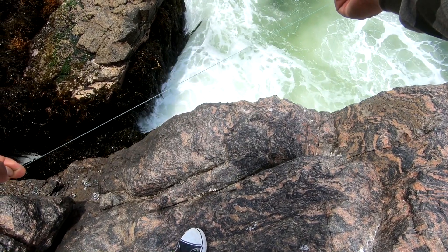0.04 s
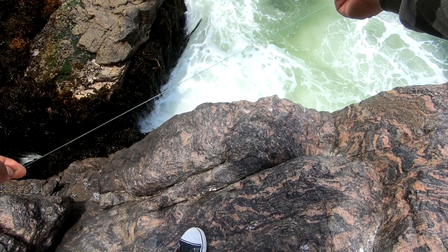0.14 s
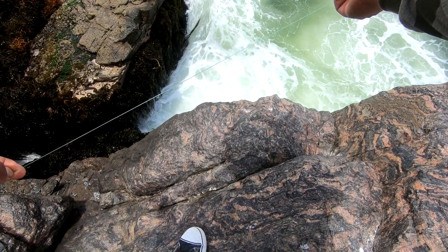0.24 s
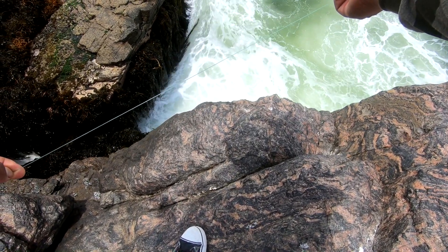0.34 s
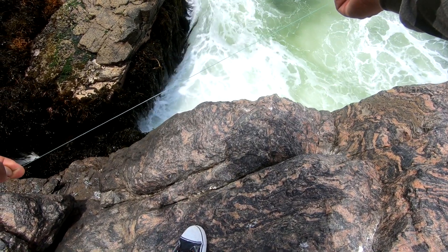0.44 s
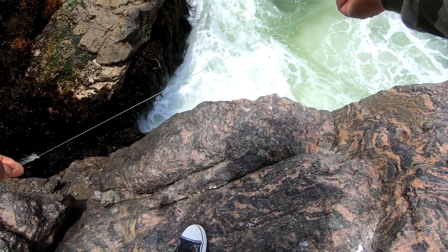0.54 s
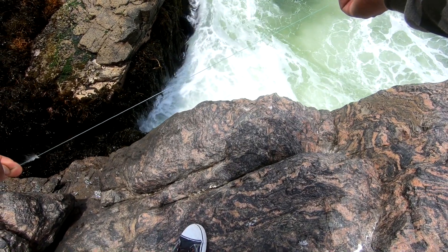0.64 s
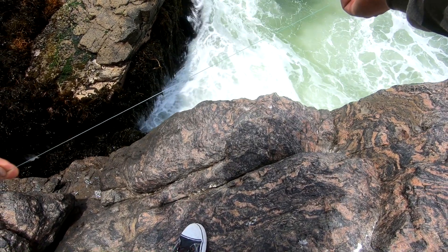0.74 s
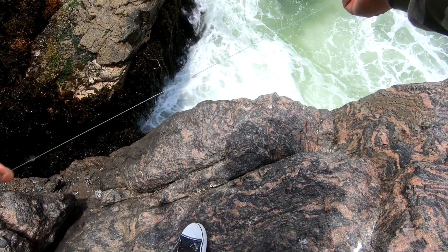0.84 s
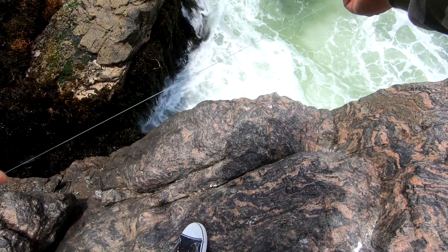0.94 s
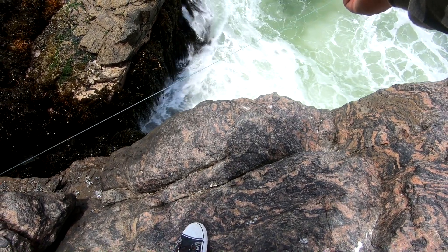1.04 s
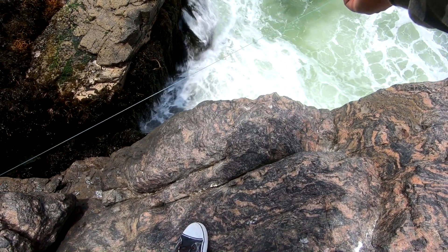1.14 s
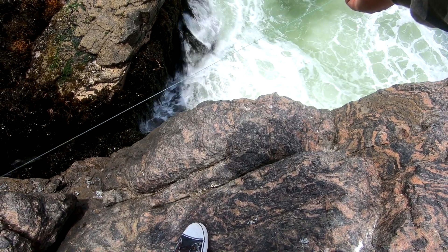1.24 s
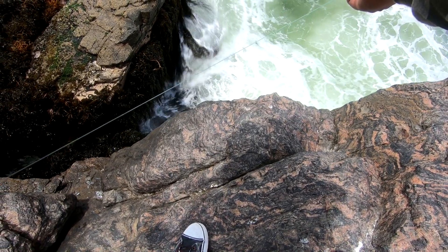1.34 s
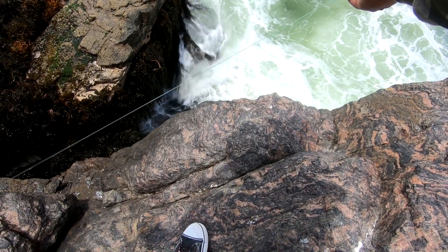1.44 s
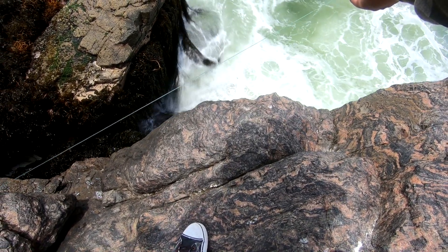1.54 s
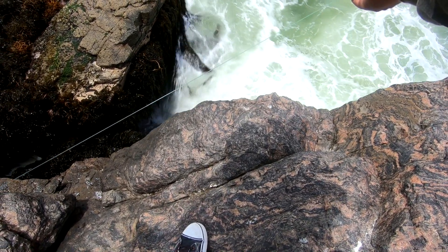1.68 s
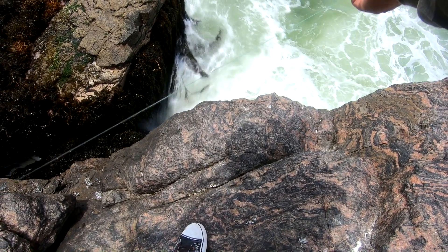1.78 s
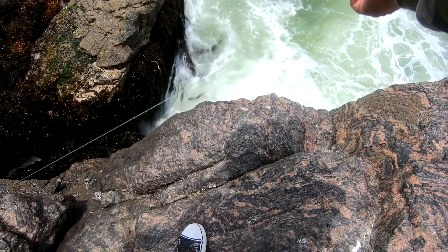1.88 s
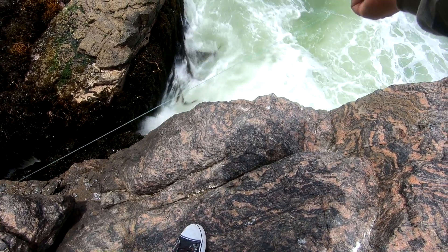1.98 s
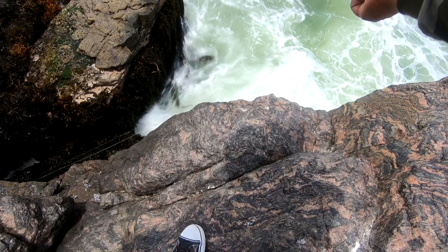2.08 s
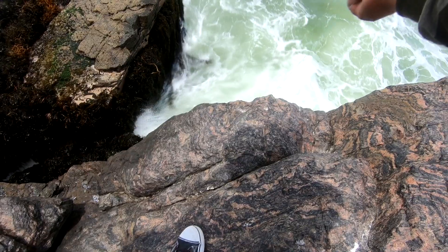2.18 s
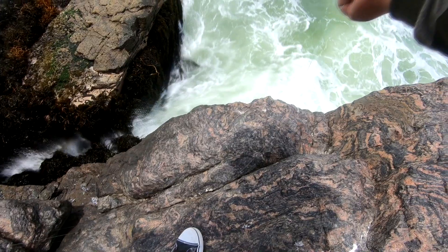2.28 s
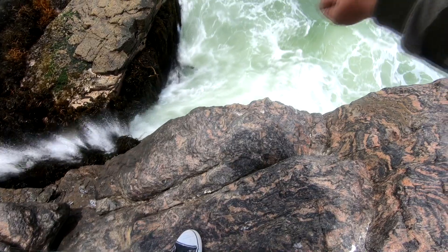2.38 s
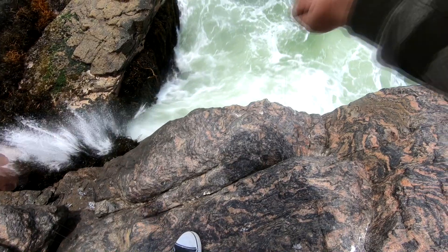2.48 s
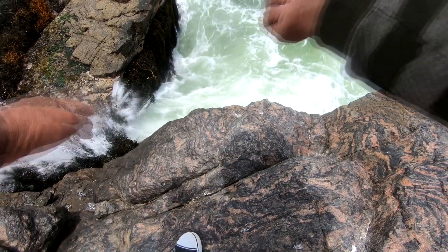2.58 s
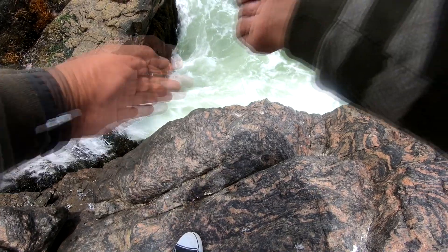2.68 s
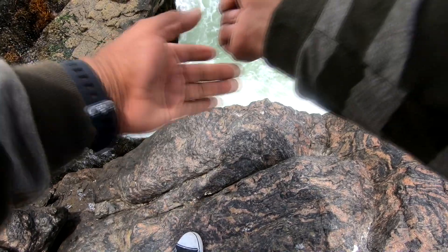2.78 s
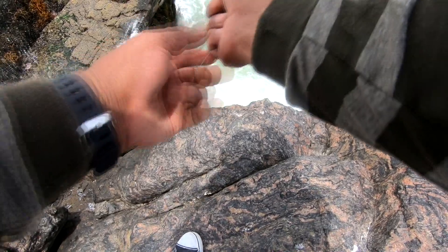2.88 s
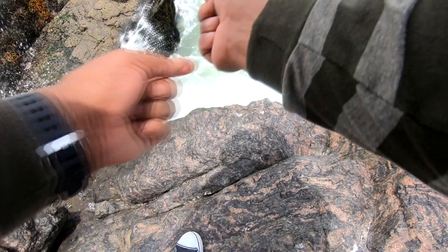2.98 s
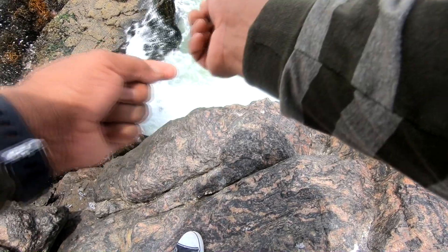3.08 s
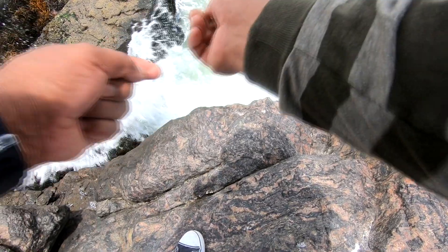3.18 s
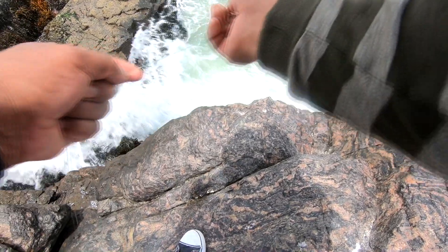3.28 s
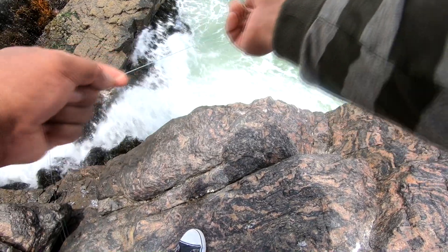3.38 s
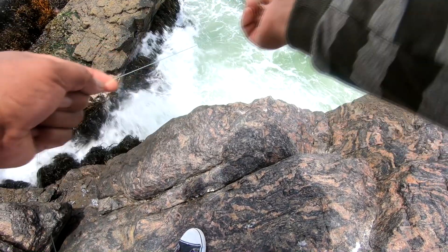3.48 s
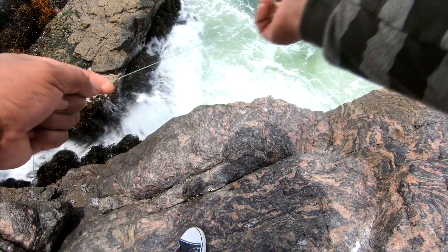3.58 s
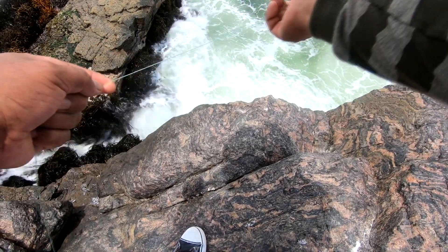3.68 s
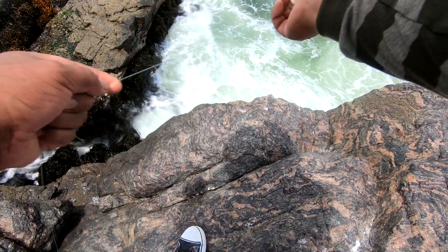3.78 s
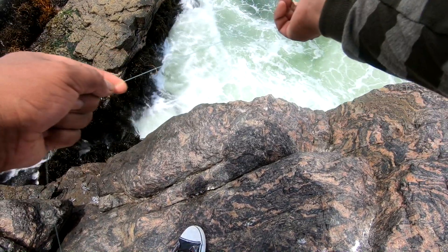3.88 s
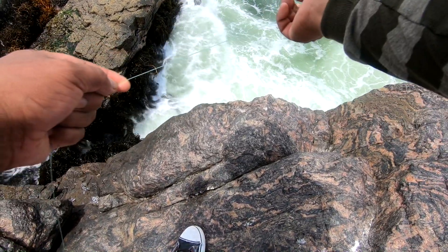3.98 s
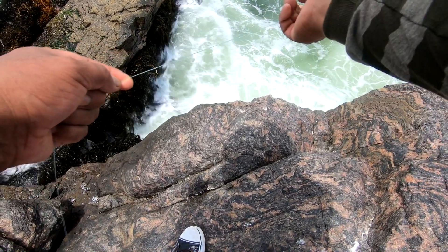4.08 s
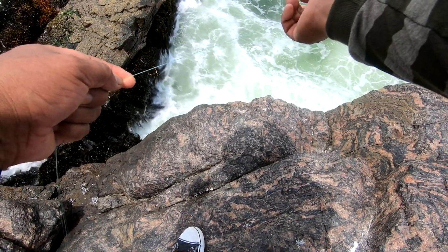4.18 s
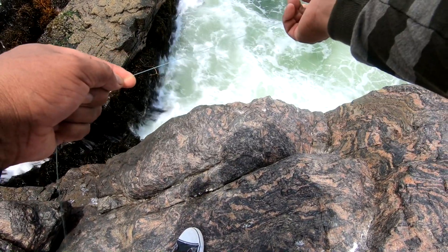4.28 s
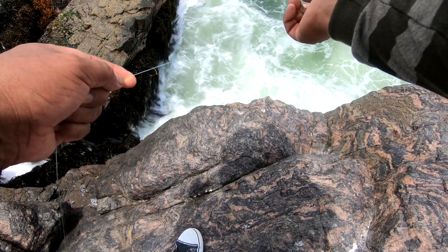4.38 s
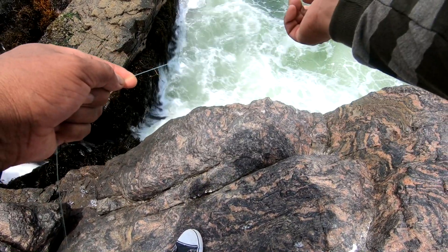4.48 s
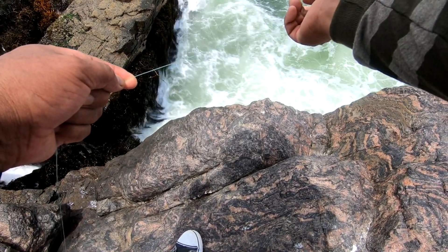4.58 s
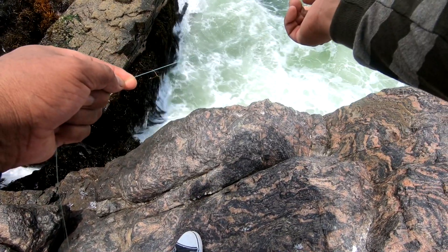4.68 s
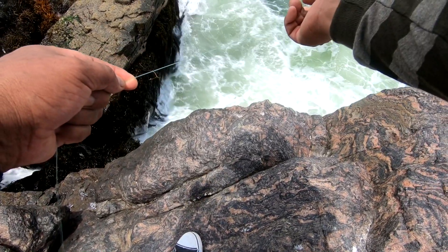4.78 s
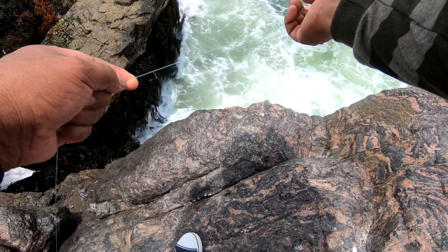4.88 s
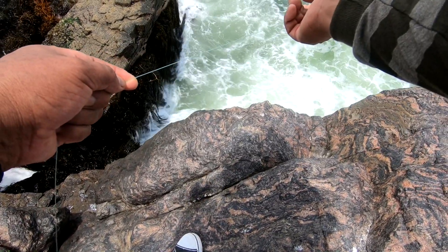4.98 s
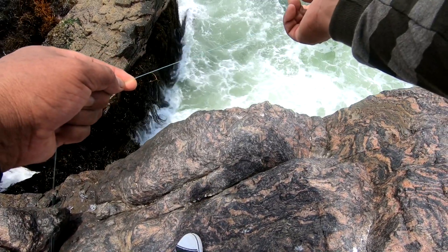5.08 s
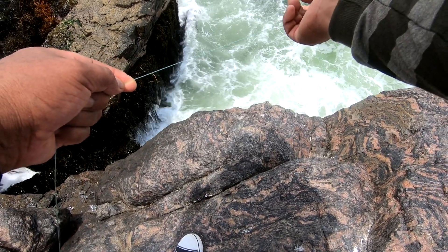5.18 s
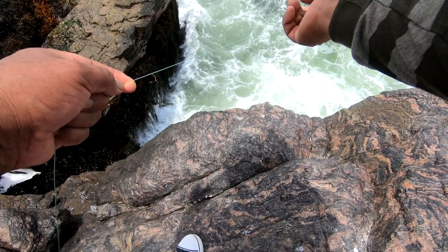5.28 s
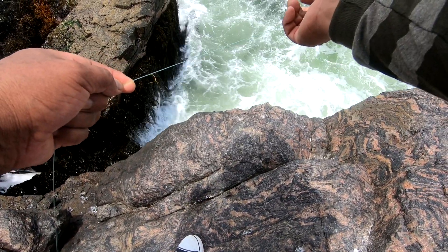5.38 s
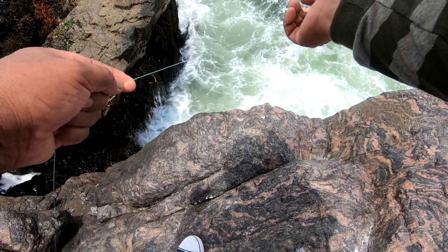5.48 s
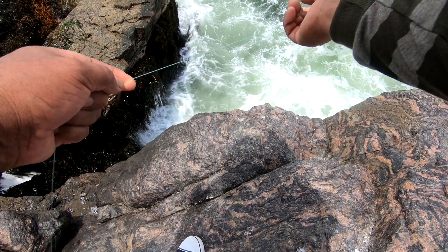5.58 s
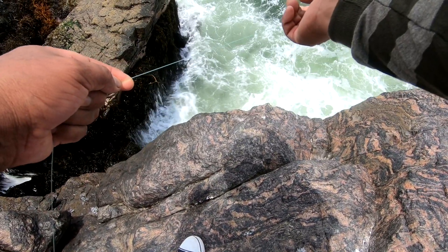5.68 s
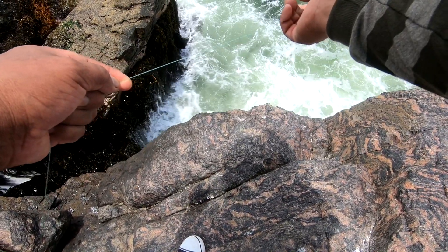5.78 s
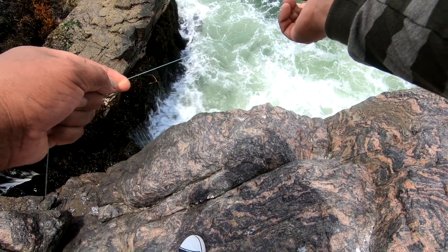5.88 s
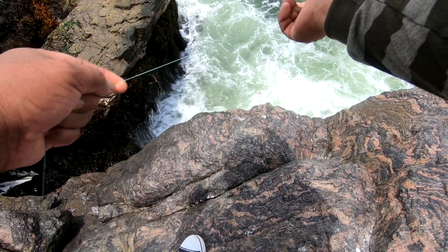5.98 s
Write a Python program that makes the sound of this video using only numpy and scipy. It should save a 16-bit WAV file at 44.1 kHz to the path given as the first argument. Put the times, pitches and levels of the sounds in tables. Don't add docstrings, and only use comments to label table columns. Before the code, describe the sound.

Outdoors on rocks above a narrow sea gully, foamy water churns with a steady wash. Wind rumble and surf build together, bursting into a rough splashing surge around two and a half seconds. The water drops back, surges once more, then settles into softer hissing foam. A small camera close to the wearer catches low buffeting gusts and a faint high air hiss.

```python
import sys
import numpy as np
from scipy import signal
from scipy.fft import rfft, irfft, next_fast_len
from scipy.io import wavfile
from scipy.ndimage import uniform_filter1d

SR = 44100
rng = np.random.default_rng(int(sys.argv[2]) if len(sys.argv) > 2 else 0)


def field_ratio(decibels):
    return 10 ** (np.asarray(decibels, dtype=float) / 20)


def dump(signal):
    limited = np.clip(np.atleast_2d(signal).T, -1, 1)
    pcm = np.round(limited * 32767).astype(np.int16)
    wavfile.write(sys.argv[1], SR, pcm)


N = 266364

# (time [s], strength [dB], big eddies over roar [dB], edge rustle over roar [dB])
GUST = [(0.0, -39.5, 8.5, -2), (0.15, -40.5, -0.5, -3), (0.32, -38.5, 0, -2.5), (0.42, -30, -7, -7.5),
        (0.66, -40.5, 5, 0), (0.79, -32.5, -1, -7), (1.09, -35, 0.5, 1), (1.39, -26, -6, -7.5),
        (1.75, -24.5, -7, -10.5), (2.12, -22.5, -1, -10.5), (2.24, -26, -2.5, -7),
        (2.36, -21.5, -6.5, -7.5), (2.95, -24.5, -4, -11), (3.3, -28.5, -1.5, -8), (4.0, -33, 6.5, -5.5),
        (4.2, -35, 2.5, -13.5), (4.61, -38.5, 0, -5), (6.04, -38.5, -1.5, -1.5)]
GUST_SHARES = [
    [0.78, 1.09, 1.17, 0.94],
    [1, 0.95, 0.022, 0.059],
    [0.27, -0.29, 0.099, 0.99],
]
WIND_ZONES_HZ = [55, 165, 350, 760]
# (frequency [Hz], density [dB per Hz])
WIND_COLOUR = [(12, -30), (25, -8.5), (60, -4), (280, 0.5), (540, -5), (760, -11.5), (980, -16.5),
               (1090, -22), (1200, -51), (1600, -80)]
# (time [s], surge [dB], spray over foam [dB], big bubbles over foam [dB])
SURGE = [(0.0, -48, -16, -4), (0.01, -44, -19, -6), (0.71, -42.5, -20.5, -4.5), (1.35, -38, -18.5, -7),
         (2.22, -34, -20.5, -9), (2.35, -33, -17, -6.5), (2.47, -30, -18, -11.5), (2.59, -35.5, -17, -7.5),
         (2.67, -31.5, -22, -9), (2.78, -37.5, -17.5, -7.5), (3.26, -41.5, -17, -8), (3.7, -34, -20, -11),
         (4.02, -35.5, -23, -12), (4.12, -43.5, -23, -5), (4.27, -44, -23, -6), (5.05, -44, -20, -6),
         (6.02, -41, -20, -9), (6.04, -41, -21, -5)]
SURGE_SHARES = [
    [0.89, 1.01, .95, 1],
    [.05, -0.14, .3, 1.1],
    [1, 0.15, .05, .05],
]
SURF_ZONES_HZ = [1500, 3290, 6430, 9500]
# (frequency [Hz], density [dB per Hz])
SURF_COLOUR = [(640, -14), (1080, -1.5), (1170, -4.5), (1580, -5), (1870, -3.5), (2140, -5), (2640, -2),
               (3220, -0.5), (4250, -2), (5140, -6), (5790, -4), (7420, -12.5), (9320, -25.5),
               (10800, -37.5), (11600, -40), (15100, -63), (22000, -120)]
# (centre [Hz], width [Hz], gain [dB])
HOUSING_MODES = [(1850, 80, 2.5), (2560, 170, 0.5), (3400, 500, 0.5), (3840, 230, 1), (4360, 250, 1),
                 (5530, 400, 0.5)]
# (time [s], hiss [dB])
PORT_FLOW = [
    (0.3, -91),
    (0.82, -85),
    (0.97, -91),
    (1.84, -69),
    (2.41, -63.5),
    (3.14, -73),
    (3.87, -65),
    (3.98, -76),
    (4.1, -104),
]
# (frequency [Hz], density [dB per Hz])
PORT_COLOUR = [(10500, -51), (11400, -11), (11900, -2), (12600, 2), (15000, -3), (15700, -4.5)]
# (time [s], level [dB], frequency [Hz], length [s])
PUFFS = [(0.026, -44, 80, 0.016), (0.058, -34.5, 324, 0.036), (0.318, -36.5, 76, 0.098),
         (0.45, -38.5, 73.4, 0.048), (0.522, -22.5, 417, 0.032), (0.767, -21.5, 86, 0.06),
         (0.806, -30, 328, 0.086), (2.386, -18, 116, 0.049), (2.621, -21.5, 137, 0.068),
         (3.159, -21.5, 88, 0.12), (3.398, -23.5, 84, 0.063), (3.566, -29, 85, 0.086),
         (3.967, -24, 270, 0.05), (4.025, -23, 244, 0.053), (4.029, -27, 65, 0.18),
         (4.912, -31, 107, 0.077), (5.152, -26.5, 84, 0.093), (5.309, -33.5, 400, 0.16),
         (5.359, -29.5, 119, 0.078), (5.778, -31, 61, 0.027), (5.817, -34.5, 72.4, 0.2),
         (0.022, -32, 637.2, 0.0152), (0.52, -27, 543, 0.0184), (0.746, -26.5, 710, 0.0172),
          (0.402, -33, 427, 0.13), (3.838, -28, 157.4, 0.0295), (3.875, -23.5, 216, 0.034),
          (4.134, -27, 230, 0.026), (3.39, -24, 231, 0.03), (3.55, -21.5, 344, 0.045),
          (2.11, -21, 237.6, 0.075), (4.966, -29, 118.8, 0.033), (5.07, -32, 60, 0.04),
          (5.353, -25, 216, 0.018), (5.357, -27, 756, 0.0093), (.1, -45, 150, .2), (.53, -27, 131, .08),
          (.87, -29, 140, .12), (1.445, -22, 298, .03), (1.5, -29, 150, .1), (1.95, -26, 169, .12),
          (2.28, -27, 90, .1), (2.67, -20, 290, .12), (3.0, -22, 190, .14), (3.04, -31, 380, .1),
          (3.72, -24, 159, .09), (4.3, -36, 165, .14), (4.36, -32, 295, .08), (4.72, -43, 420, .2),
          (4.85, -34, 250, .06), (5.96, -34, 150, .05)]
# (start [s], end [s], difference [dB])
WIDTH = [(.05, 0.17, -66), (0.282, 1.026, -64.5), (1.048, 1.673, -59), (1.893, 1.959, -54),
         (2.344, 2.442, -51), (2.7, 2.752, -54), (2.834, 2.91, -58), (2.945, 3.154, -58),
         (3.45, 3.537, -58), (3.667, 3.713, -56), (3.972, 4.093, -58.5), (4.752, 4.816, -67)]
# (frequency [Hz], density [dB per Hz])
WIDTH_COLOUR = [(700, -12), (1000, -6), (2400, -7.5), (3400, -7.5), (5000, -7), (6500, -6), (8500, -17),
                (10000, -31)]
# (start [s], end [s], centre [Hz], width [Hz], gain [dB])
SHADING = [(0, 0.61, 2320, 550, -4), (-0.5, .8, 4800, 500, 3), (0.3, 1.63, 880, 140, -4),
           (1.1, 1.19, 2900, 910, 2), (0.7, 1.89, 2780, 520, 3), (4.1, 4.5, 5600, 2000, 1.5),
           (2.5, 3.36, 9700, 1900, -5), (3, 3.3, 3100, 680, -2.5), (1.2, 1.53, 192, 70, -4.5),
           (1.5, 2.8, 1840, 200, 2), (1.1, 2.6, 2250, 390, -3), (2.5, 2.75, 1080, 120, 3.5),
           (3.5, 4.2, 4450, 830, -4), (3.5, 4.2, 6100, 740, 3), (3.6, 5.0, 3280, 310, 3)]


def rms_one(x):
    return x / np.sqrt(np.mean(x ** 2) + 1e-20)


def in_time(rows):
    time_s, *columns = np.transpose(rows)
    return [np.interp(np.arange(N) / SR, time_s, column) for column in columns]


def at_hz(points_hz, values, hz):
    return np.interp(np.log(hz), np.log(points_hz), values)


def drift(rate_hz):
    pole = np.exp(-80 * np.pi * rate_hz / SR)
    noise = rng.standard_normal(N // 40 + 2002)
    slow = signal.lfilter([1], [1, -2 * pole, pole * pole], noise)[2000:]
    return np.interp(np.arange(N) / 40, np.arange(len(slow)), rms_one(slow))


def pops(per_s, spread_db):
    size_db = spread_db * np.minimum(rng.exponential(1, N), 5)
    clicks = field_ratio(size_db) * rng.choice([-1, 1], N)
    return rms_one(clicks * (rng.random(N) < per_s / SR))


def coloured(source, colour):
    size = next_fast_len(N)
    hz = np.maximum(np.fft.rfftfreq(size, 1 / SR), 1)
    return rfft(source, size) * field_ratio(at_hz(*np.transpose(colour), hz)), hz


def coloured_noise(colour):
    spectrum, _ = coloured(rng.standard_normal(N), colour)
    return rms_one(irfft(spectrum)[:N])


def zone_levels(curve, mean_db, shares):
    controls = np.array(in_time(curve))
    swing = controls - controls.mean(axis=1, keepdims=True)
    return mean_db + np.transpose(shares) @ swing


def zones(spectrum, hz, zones_hz, levels_db, count, shared_db, own_db, shared_rate_hz, own_rate_hz):
    power = np.mean(field_ratio(levels_db) ** 2, axis=1)
    swell_db = levels_db - 10 * np.log10(power)[:, None]
    centres_hz = np.geomspace(zones_hz[0] / 2, zones_hz[-1] * 1.52, count)
    together = drift(shared_rate_hz)
    out = 0
    for centre_hz, one_band in zip(centres_hz, np.eye(count)):
        nearness = [at_hz(zones_hz, one_zone, centre_hz) for one_zone in np.eye(len(zones_hz))]
        flicker_db = shared_db * together + own_db * drift(own_rate_hz)
        band = irfft(spectrum * at_hz(centres_hz, one_band, hz))[:N]
        out = out + band * field_ratio(nearness @ swell_db + flicker_db)
    return out * np.sqrt(power.sum()) / np.std(irfft(spectrum))


def wind():
    eddies = pops(per_s=250, spread_db=2.5) * field_ratio(-7) + rng.standard_normal(N)
    spectrum, hz = coloured(eddies, WIND_COLOUR)
    levels_db = zone_levels(GUST, -34.5, GUST_SHARES)
    return zones(spectrum, hz, WIND_ZONES_HZ, levels_db, count=11,
                 shared_db=0.92, own_db=-0.05, shared_rate_hz=36, own_rate_hz=5.0)


def surf():
    bursts = pops(per_s=9000, spread_db=2.5) * field_ratio(-3) + rng.standard_normal(N)
    spectrum, hz = coloured(bursts, SURF_COLOUR)
    ringing_db = 0
    for centre_hz, width_hz, gain_db in HOUSING_MODES:
        ringing_db = ringing_db + gain_db / (1 + (2 * (hz - centre_hz) / width_hz) ** 2)
    levels_db = zone_levels(SURGE, -45, SURGE_SHARES)
    return zones(spectrum * field_ratio(ringing_db), hz, SURF_ZONES_HZ, levels_db, count=14,
                 shared_db=0.3, own_db=0.78, shared_rate_hz=40, own_rate_hz=14)


def port_hiss():
    crest_share, flicker_db = 0.7, 0.6
    pan_db, pan_full_db, pan_span_db = -5.5, -68, 20
    flow_db, = in_time(PORT_FLOW)
    surge_db, spray_db, _ = in_time(SURGE)
    thrown_db = surge_db + spray_db
    crest_db = thrown_db - uniform_filter1d(thrown_db, size=SR // 2)
    lean_db = pan_db * np.clip(1 + (flow_db - pan_full_db) / pan_span_db, 0, 1)
    t = np.arange(N) / SR
    blowing = np.clip((t + 0.05) / 0.4, 0, 1) * (t < PORT_FLOW[-1][0])
    level_db = flow_db + 5.5 + crest_share * crest_db + flicker_db * drift(14)
    hiss = np.array([coloured_noise(PORT_COLOUR) for side in "LR"])
    return field_ratio(level_db + np.outer([0.5, -0.5], lean_db)) * blowing * hiss


def puffs():
    out = np.zeros(N + SR)
    for time_s, level_db, hz, length_s in PUFFS:
        size = int(length_s * 0.75 * SR)
        sos = signal.butter(2, [hz / 1.77, hz * 1.55], "band", fs=SR, output="sos")
        turbulence = signal.sosfilt(sos, rng.standard_normal(SR // 2))[-size:]
        start = max(int(time_s * SR) - size // 2, 0)
        out[start:start + size] += field_ratio(level_db - 4) * rms_one(turbulence * np.hanning(size))
    return out[:N]


def width():
    t = np.arange(N) / SR
    gate = sum(field_ratio(db) * ((t > start_s) & (t < end_s)) for start_s, end_s, db in WIDTH)
    return uniform_filter1d(gate, size=600) * coloured_noise(WIDTH_COLOUR) * [[1], [-1]]


def shaded(x):
    size = next_fast_len(N)
    spectrum, hz = rfft(x, size), np.fft.rfftfreq(size, 1 / SR)
    t = np.arange(N) / SR
    out = x.copy()
    for start_s, end_s, centre_hz, width_hz, gain_db in SHADING:
        band = irfft(spectrum * np.exp(-2 * ((hz - centre_hz) / width_hz) ** 2))[:N]
        swell = np.clip(np.minimum(t - start_s, end_s - t) / 0.086 + 0.5, 0, 1)
        out += (field_ratio(gain_db) - 1) * swell * band
    return out


def housed(gusts):
    stiff_peak, cut_hz = 0.42, 1067
    stiffened = stiff_peak * np.tanh(gusts / stiff_peak)
    sos = signal.cheby2(6, 35, cut_hz * 1.237, fs=SR, output="sos")
    return signal.sosfilt(sos, stiffened)


def scene():
    roar, foam, hiss = wind(), surf(), port_hiss()
    gusts = housed(roar + puffs())
    return shaded(gusts + foam) + width() + hiss


def low_pass(x):
    return signal.sosfilt(signal.butter(12, 15715, fs=SR, output="sos"), x)


def record(dry):
    return low_pass(dry)


dry = scene()
out = record(dry)
dump(out)
```